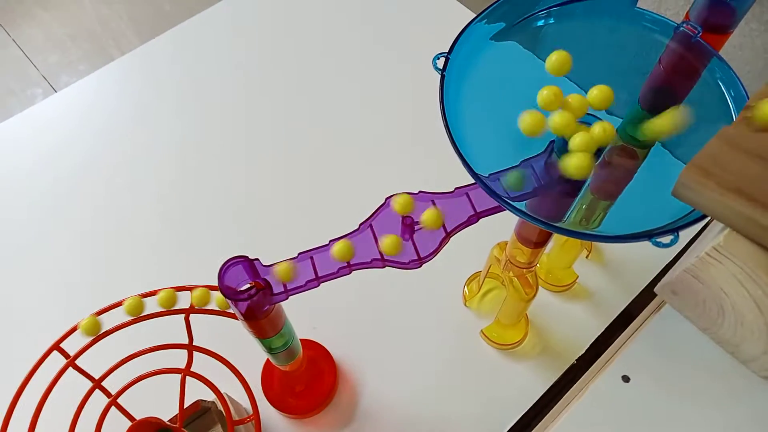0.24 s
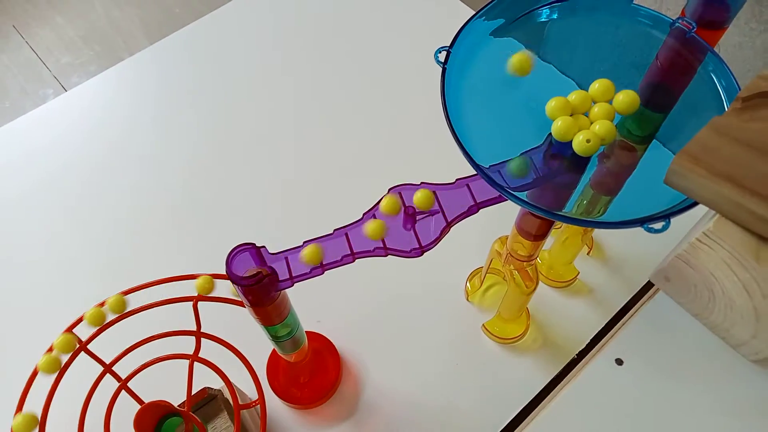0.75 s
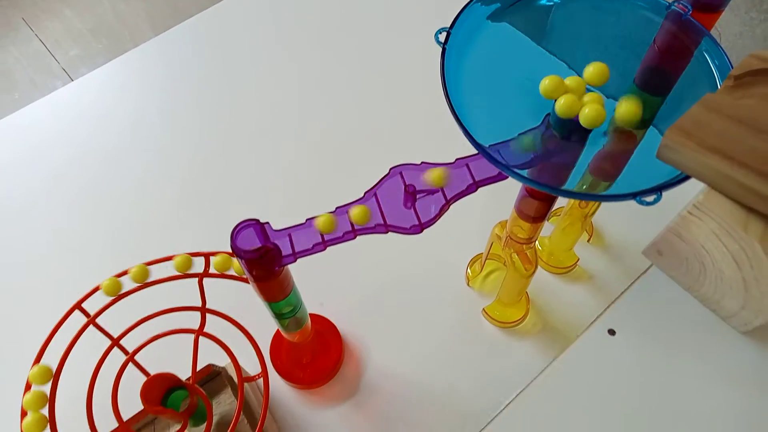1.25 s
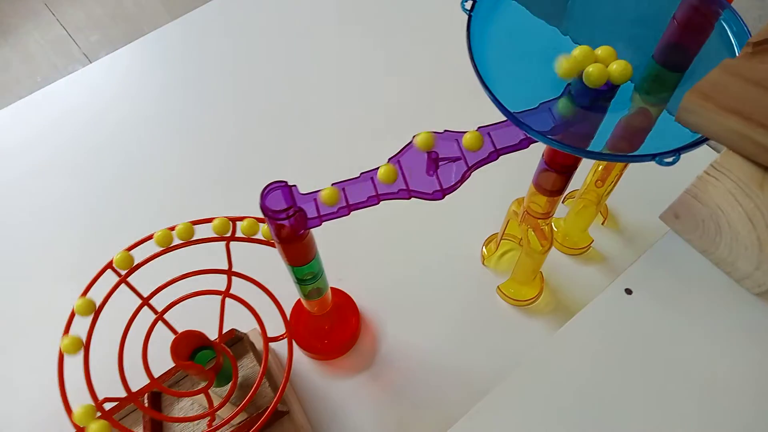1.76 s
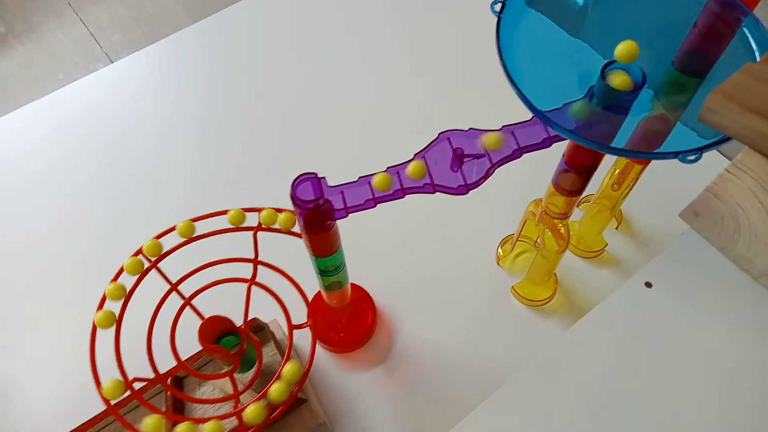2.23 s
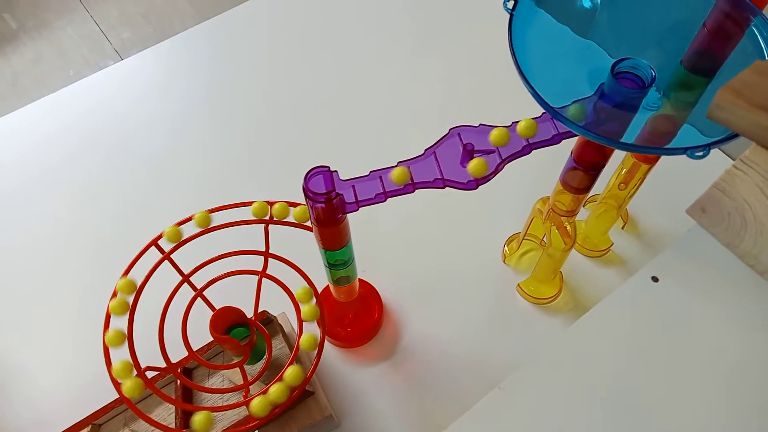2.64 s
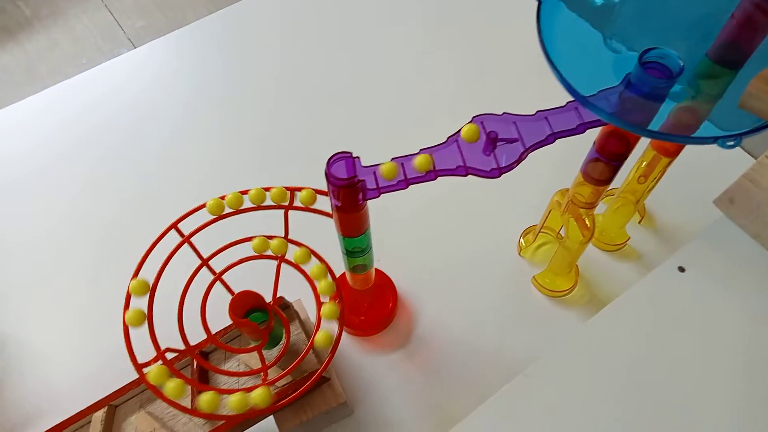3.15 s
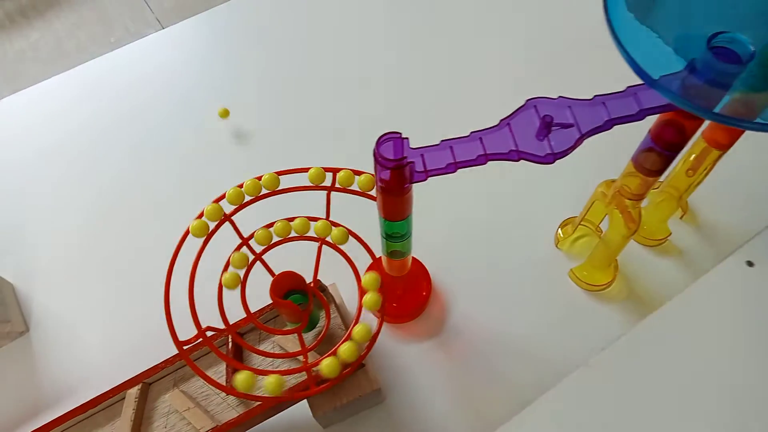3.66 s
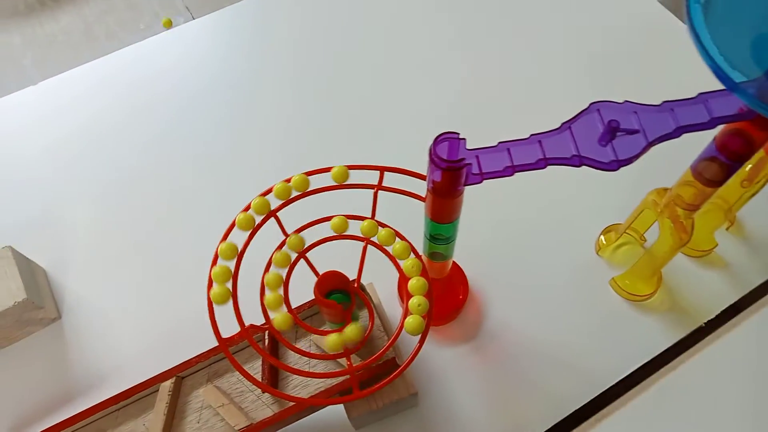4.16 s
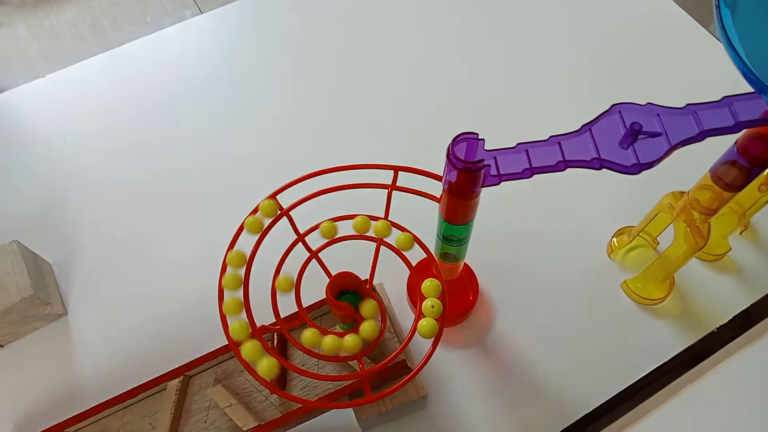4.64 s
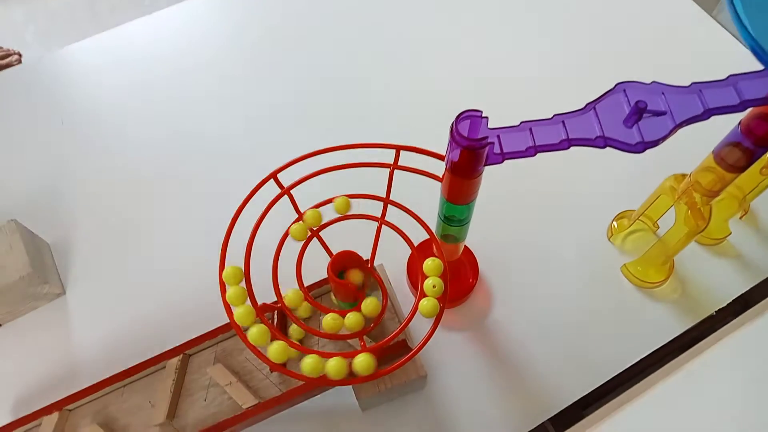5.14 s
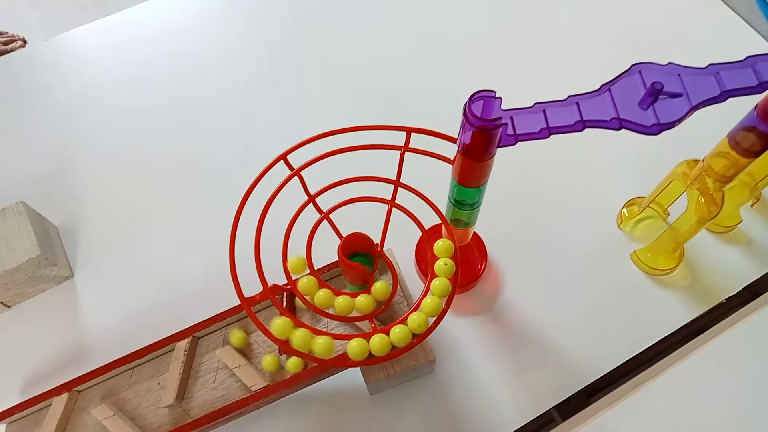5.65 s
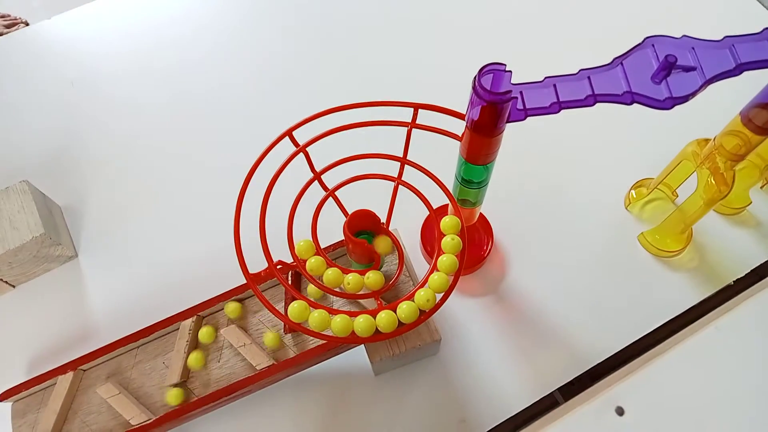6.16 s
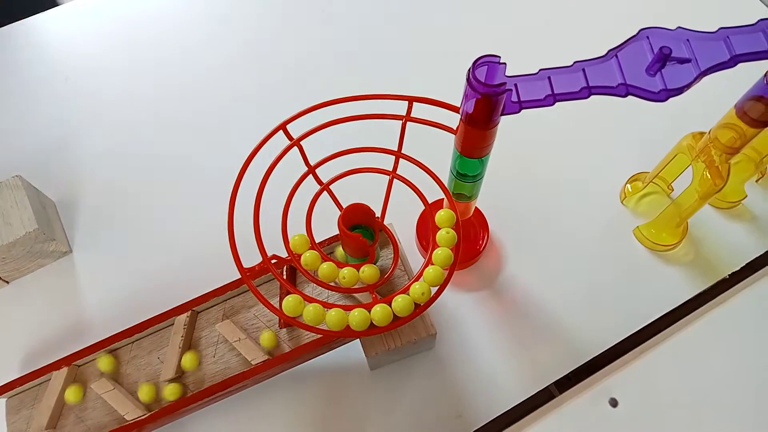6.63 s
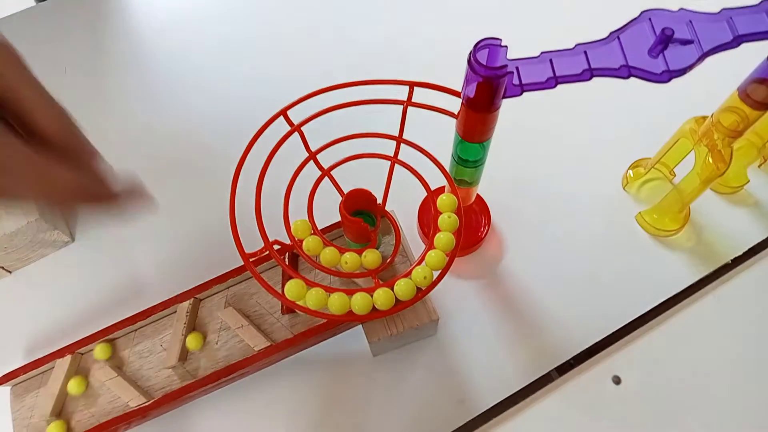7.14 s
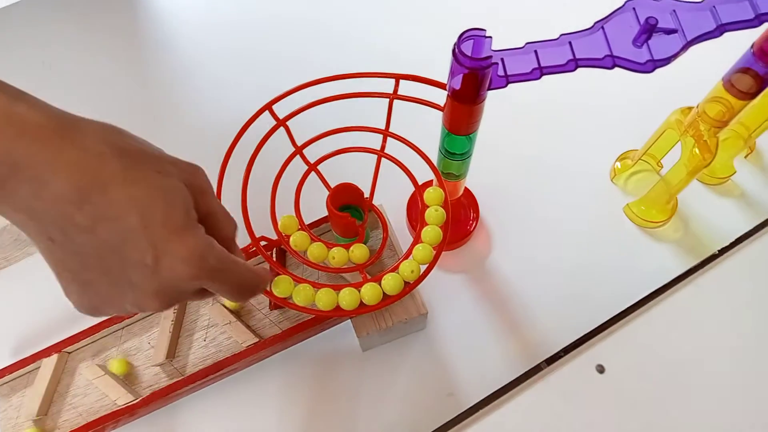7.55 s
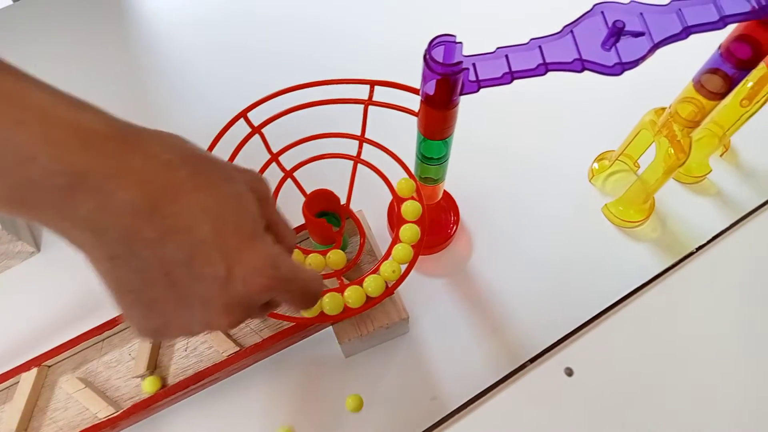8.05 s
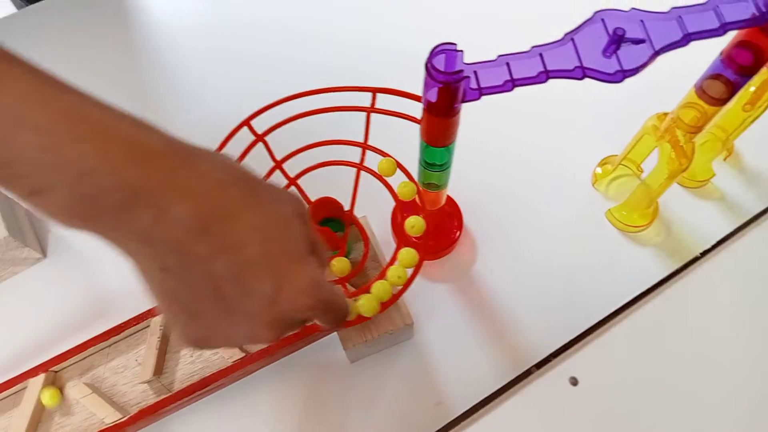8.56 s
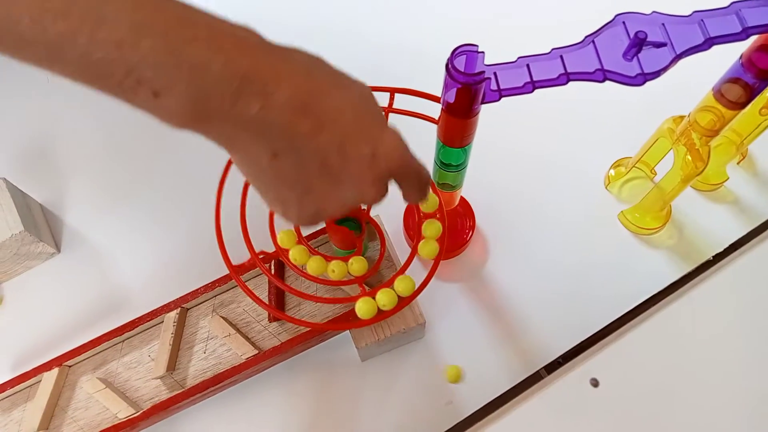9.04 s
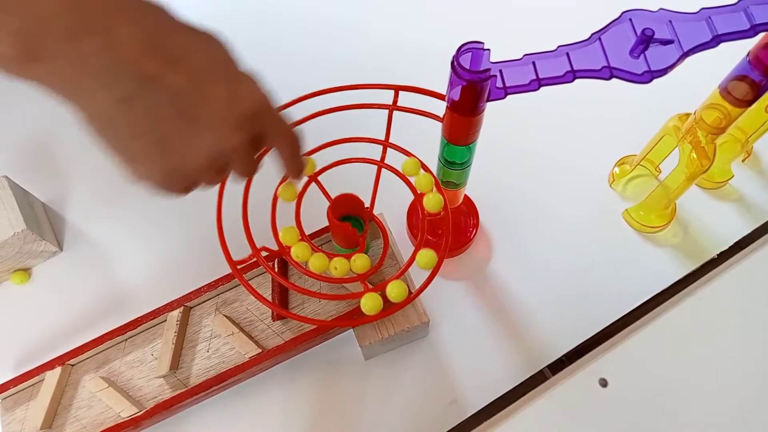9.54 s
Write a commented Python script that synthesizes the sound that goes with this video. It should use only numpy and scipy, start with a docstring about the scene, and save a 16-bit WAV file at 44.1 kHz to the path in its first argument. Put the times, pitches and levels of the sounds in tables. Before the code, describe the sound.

Close up in a bare, lively room, a crowd of light plastic balls clatters through toy tracks. Hollow tube drops and dense chatter come first, easing into sparser clicks. A stray ball skips away with accelerating, fading ticks; distant floor bounces and faint metallic pings follow. Woody knocks patter down a ramp, with soft table bumps, before stirred marbles clack loudly and irregularly, much stronger than before, and tail off.

```python
"""Marbles in a toy track

Plastic marbles run through funnel, chute, spiral rails and wooden ramp on a table in a bare room; a hand stirs the jam.
Clacks and rattle are impulses filtered by contact spectra; tube, track, ramp, table and metal ring as damped modes.
Floor bounces are bare clicks; rolling, funnel hum and a low rumble are filtered noise.
Dense decaying echoes, led by one wall, form the room."""
import sys
import numpy as np
from scipy import signal
from scipy.fft import rfft, irfft
from scipy.io import wavfile

SR = 44100
rng = np.random.default_rng(int(sys.argv[2]) if len(sys.argv) > 2 else 0)


def dump_mix(stems):
    """Bounce the given channels to the path in sys.argv[1] as a 16-bit WAV at rate SR."""
    frames = np.atleast_2d(stems).T  # one column per channel
    limited = np.clip(frames, -1, 1)  # hard clip at full scale
    pcm = np.round(limited * 32767).astype(np.int16)
    wavfile.write(sys.argv[1], SR, pcm)


N = 432180
LEAD = SR // 2   # samples: the marbles are already running when the sound begins

# All levels in the tables are relative: some sources are scaled again in the mix.
# single clacks: start_s, body_level_db, tick_level_db
CLACK_EVENTS = [(1.002, -11, -14.5), (1.2694, -14.5, -22), (1.284, -15.5, -8.5), (1.5283, -12.5, -14),
                (2.2617, -35, -11.5), (2.3761, -18, -10.5), (2.5508, -21, -9.5), (3.2436, -31.5, -25.5),
                (3.4304, -12, -16), (3.541, -22, -14.5), (3.6868, -15, -23), (3.7458, -31, -40),
                (5.2859, -16, -29), (5.8579, -10.5, -22), (7.1397, 0, -11.5), (7.2427, -2, -17),
                (7.328, -3, -23), (7.3709, -1, -39), (7.399, -7, -15.5), (7.462, -7, -14),
                (7.4792, 1.5, -15), (7.5009, -5, -9.5), (7.525, -4, -20), (7.5742, -1, -13),
                (7.591, -8, -11), (7.6056, -3, -30), (7.657, -4, -24), (7.674, -3, -11),
                (7.6939, -1.5, -24), (7.768, -1.5, -18), (7.7781, -3, -14.5), (7.8345, 1, -9),
                (7.864, -2.5, -13), (7.898, -7.5, -22), (7.9387, -0.5, -29), (8.0058, 0, -4.5),
                (8.1203, -3, -1.5), (8.2719, -2.5, -6.5), (8.3477, -7, -18), (8.4092, -1.5, -6),
                (8.4764, -3.5, -13.5), (8.5418, -9, -26), (8.617, -12, -27), (8.6276, -5, -19),
                (8.68, -16.5, -29), (8.7348, -8.5, -32), (8.8276, -11, -34), (9.0517, 0.5, -4),
                (9.1799, -10.5, -21), (9.2673, -11.5, -33), (9.324, 2, -4.5)]
# hollow of the plastic under a clack: pitch_hz, level_db, t60_s
HOLLOW_MODES = [(556, 1, 0.019), (873, 0.5, 0.026)]
# one marble jumps the track and hops across the table: start_s of each touch
HOP_TIMES = [3.329, 3.6006, 3.782, 3.9049, 4.0003, 4.0755, 4.135]
HOP_DB, HOP_LOSS_DB = 2, 3   # body of the first touch, and loss with every hop
HOP_TICK_DB, HOP_TICK_LOSS_DB = -6.5, 6.5
HOP_THUD_DB = -32.5   # answer of the table top to the first hop
# spectrum of a sharp contact as the microphone colours it: pitch_hz, level_db
CONTACT_SPECTRUM = [(350, -18.5), (570, -15), (720, -6), (880, -8), (1230, -9.5), (2130, -1.5),
                    (3440, -0.5), (5190, -14), (7010, 0.5), (8600, -15), (12600, -28.5), (15300, -9.5)]

# loose rattle of many marbles: start_s, level_db
RATTLE_LEVEL = [(0, -29), (1.1, -35.5), (1.4, -30), (1.95, -36), (2.3, -28.5), (3.2, -33.5), (4.2, -31.5),
                (4.35, -42), (5.7, -35.5), (6.0, -30), (6.9, -28), (7.3, -24), (7.9, -25), (8.9, -28),
                (9.449, -26.5), (9.8, -47)]
RATTLE_SPREAD_DB, RATTLE_ROOM_DB = 3.5, -6
# where the crowd is: funnel, chute, spiral rails, wooden ramp, stirred by hand:
# start_s, contacts_per_s, tick_db, hollow_db, track_ring_db (these three above the body),
# sparkle_db (above the tick), knock_db (hollow knock above the body of a single clack)
CROWD_STAGES = [(0, 450.1, -3, -5, 0.5, -4, -18), (2.6, 198.8, 1.5, -4, 0, -9.5, -15),
                (3.799, 303.3, -10, -12, -8, -7, -11), (5.9, 168, -18.5, -14.5, -10.5, -16.5, -14),
                (7.0, 168.7, -4, -2, -32, -20, -9)]
STAGE_FADE_S = 0.24
# short rings of the plastic track pieces: pitch_hz, level_db, t60_s
TRACK_MODES = [(943, -12.5, 0.097), (1590, 1.5, 0.023), (2504, -2, 0.094), (3572, 9.5, 0.011)]

# drops into the tube under the funnel: start_s, level_db
DROP_EVENTS = [(0.0169, -4.5), (0.076, -6.5), (0.162, -5.5), (0.3594, -5), (0.495, -6)]
# modes of the tube: pitch_hz, level_db, t60_s
TUBE_MODES = [(1484, -1, 0.018), (1554, 3, 0.023)]
TUBE_CLACK_DB, TUBE_TICK_DB = -6, -3   # each drop also clacks; relative to the drop's level

# landings on the ramp: start_s, ring_level_db, clack_level_db
LANDING_EVENTS = [(4.666, -25.5, -8.5), (4.708, -20.5, -39), (4.851, -36, -17), (4.995, -25, -11),
                  (5.106, -29, -14.5), (5.157, -31.5, -15.5), (5.355, -22.5, -11), (5.466, -28.5, -18.5),
                  (5.777, -23.5, -10.5), (6.429, -21, -6.5), (6.499, -28, -27)]
# modes of the wooden ramp: pitch_hz, level_db, t60_s
RAMP_MODES = [(226, -2, 0.021), (890, 0, 0.045), (1705, 1, 0.035), (2090, 0, 0.06), (2490, 0, 0.04),
              (2692, 2, 0.06), (2902, 3, 0.085)]
LANDING_TICK_DB = -20   # relative to the clack
REBOUND_S, REBOUND_DB = 0.013, -2   # a landing marble touches again at once
SKITTER_S = 0.037   # decay time constant of the flurry as a marble skitters on
# marbles knock the slats on their way down the ramp: start_s, level_db
SLAT_EVENTS = [(5.884, -11), (5.901, -18), (5.942, -18), (5.9876, -17), (6.088, -13.5), (6.1075, -23),
               (6.123, -17), (6.2149, -14.5), (6.363, -20), (6.4052, -12.5), (6.5457, -20), (6.572, -9),
               (6.6874, -18), (6.7098, -19), (6.765, -15), (6.881, -15), (6.963, -13), (7.016, -11.5),
               (7.0528, -17.5), (7.087, -19), (7.195, -10.5)]
# modes of a slat: pitch_hz, level_db, t60_s
SLAT_MODES = [(2675, 3, 0.013), (3330, 4.5, 0.013)]
SLAT_CLACK_DB, SLAT_TICK_DB = 0, -12.5   # relative to the knock

# bounces on the hard floor, further off: start_s, level_db
BOUNCE_EVENTS = [(4.041, -13.5), (4.514, -7.5), (4.5282, -5), (4.6304, -10.5), (4.876, -13),
                 (5.1072, -12.5), (5.3133, -20), (5.409, -28), (5.739, -16), (6.44, -13.5), (8.8418, -8.5),
                 (9.4865, -9), (9.739, -11.5)]
# spectrum of one floor bounce: pitch_hz, level_db
BOUNCE_SPECTRUM = [(2350, -19.5), (4000, -0.5), (5230, -19.5), (7530, 3), (8730, -4.5), (15600, -12.5)]
# marbles touching something metal by the floor: start_s, level_db
PING_EVENTS = [(4.7064, -25), (5.0554, -25.5), (5.1064, -27.5), (5.3168, -35), (5.412, -36.5), (5.739, -26)]
# modes of the metal: pitch_hz, level_db, t60_s
METAL_MODES = [(7710, 4, 0.35), (9600, -0.5, 0.053), (14100, -25, 0.13)]

# bumps against the table: start_s, level_db
BUMP_EVENTS = [(6.838, -18.5), (6.857, -19.5), (7.061, -13.5)]
# modes of the table top: pitch_hz, level_db, t60_s
TABLE_MODES = [(97, -12.5, 0.85), (170, 1, 0.07), (275, 5, 0.055), (350, 3, 0.035), (500, -2, 0.03)]
TABLE_ROOM_DB = -16
# a dull low handling thud: start_s, level_db
THUD_EVENTS = [(4.775, -37)]
# mode of the handling thud: pitch_hz, level_db, t60_s
THUD_MODES = [(64, 0, .4)]

# marbles rolling down the wood: start_s, length_s, level_db
ROLLING_RUNS = [(5.847, 0.17, -25), (6.606, 0.18, -31.5), (6.871, 0.23, -26.5)]
ROLL_EDGE_S, ROLL_SAG_DB_PER_S = 0.017, 18
# hum of the funnel under circling marbles
FUNNEL_HZ, FUNNEL_WIDTH_HZ, FUNNEL_DB, FUNNEL_EMPTIES_DB_PER_S = 136.2, 2.5, -37, 14

# spectrum of the low rumble: pitch_hz, level_db
RUMBLE_SPECTRUM = [(25, -29), (49, -9), (123, 7), (413, -5), (600, -19), (1320, -120)]
# the low rumble comes and goes: start_s, level_db
RUMBLE_LEVEL = [(0, -41.5), (1.5, -44.5), (4, -51), (5.5, -41.5), (8.5, -50)]
# reverberation time of the room: pitch_hz, t60_s
ROOM_DECAY = [(200, 1), (700, 0.8), (3000, 0.92), (9000, 0.35), (15000, 0.42)]
ROOM_GAP_S = 0.010   # the echoes rise from silence over this time
SLAP_S, SLAP_DB = 0.021, 7   # the nearest wall answers in one lump
SEND_CUT_HZ = 8400   # the treble of near marbles hardly fills the room
CUTOFF_HZ = 16200


def clacks(parts):
    """Impact of hard plastic: a contact spectrum over a damped hollow; returns direct sound and room send."""
    near, far = np.zeros(N + 1100), np.zeros(N + 1100)
    hollow_blows = []
    for s, body_db, tick_db in blows():
        *_, sparkle_db, knock_db = crowd(s)
        click = from_db([body_db, tick_db, tick_db + sparkle_db]) @ parts[[0, 1, 3]]
        at = round(s * SR)
        near[at:at + 1099] += from_db(-5.0) * np.convolve(click, contact(length_s=0.0032))
        far[at:at + 700] += from_db(5.5) * click
        hollow_blows.append((s, body_db + knock_db))
    knock = ring(hollow_blows, HOLLOW_MODES, spread_db=0.5, touch_s=0.0023, detune=0.052)
    knock = band(knock, 244, 2440)
    return near[:N] + knock, far[:N] + from_db(-8.0) * knock


def blows():
    """Collisions as point events (start_s, body_db, tick_db): clacks, hops, drops, slat knocks and landings."""
    hops = [(s, HOP_DB - HOP_LOSS_DB * k, HOP_TICK_DB - HOP_TICK_LOSS_DB * k)
            for k, s in enumerate(HOP_TIMES)]
    drops = [(s, db + TUBE_CLACK_DB, db + TUBE_TICK_DB) for s, db in DROP_EVENTS]
    knocks = [(s, db + SLAT_CLACK_DB, db + SLAT_TICK_DB) for s, db in SLAT_EVENTS]
    landings = [(s, db, db + LANDING_TICK_DB) for s, _, db in LANDING_EVENTS]
    rebounds = [(s + REBOUND_S, db + REBOUND_DB, tick_db) for s, db, tick_db in landings]
    return CLACK_EVENTS + hops + drops + knocks + landings + rebounds


def voices():
    """Spectral decomposition of a sharp contact into body, tick, hollow and sparkle, each of peak 1."""
    click = impulse(CONTACT_SPECTRUM)[:700]
    ranges_hz = [(1066, 4000), (3850, 9200), (305, 2120), (9230, 14340)]
    parts = np.array([band(band(click, low, high), low / 2, high) for low, high in ranges_hz])
    return parts / np.abs(parts).max(axis=1, keepdims=True)


def contact(length_s):
    """Chatter of a contact: one sharp touch, then a random flurry decaying exponentially."""
    touches = 0.5 * rng.standard_normal(400) * np.exp(-np.arange(400) / (length_s * SR))
    touches[0] = 1
    return touches


def rattle(parts):
    """Random point process: short contacts of uneven size, each with its own spectral balance and track ring."""
    count = N + LEAD
    t = (np.arange(count) - LEAD) / SR
    body_db, per_s, tick_db, hollow_db, ring_db, sparkle_db, _ = crowd(t)
    at = np.flatnonzero(rng.random(count) < per_s / SR)
    size_db = RATTLE_SPREAD_DB * np.minimum(rng.exponential(1, len(at)), 3.0)
    decay = np.exp(-1 / (0.0029 * SR))
    out = 0
    for db, part in zip([0, tick_db, hollow_db, tick_db + sparkle_db], parts):
        struck = np.full(count, 1e-18)
        struck[at] = from_db(size_db + 5 * rng.standard_normal(len(at)))
        flurry = signal.lfilter([1], [1, -decay], struck) * rng.standard_normal(count)
        bursts = flurry + 2.9 * struck
        out = out + from_db(db) * rms_one(coloured(bursts, part))
    rings = band(track_rings(at, size_db, count), 380, 4700)
    return from_db(body_db) * (out + from_db(ring_db) * rms_one(rings))


def track_rings(at, size_db, count):
    """Two-pole resonance: each contact excites one mode, drawn from three differently tuned sets."""
    piece = rng.integers(0, 3 * len(TRACK_MODES), len(at))
    rings = 0
    for k, (hz, level_db, t60) in enumerate(TRACK_MODES * 3):
        struck = np.full(count, 1e-18)
        struck[at[piece == k]] = from_db(size_db[piece == k] + level_db)
        radius = from_db(-60 / (t60 * SR))
        detune = 1 + 0.043 * (k // len(TRACK_MODES) - 1)
        w = 2 * np.pi * hz * detune / SR
        rings = rings + signal.lfilter([1, 0, -1], [1, -2 * radius * np.cos(w), radius ** 2], struck)
    return rings


def crowd(t):
    """Linear interpolation of the rattle level and the stage columns, one stage fading into the next."""
    rows = np.array(CROWD_STAGES)
    ends = np.append(rows[1:, 0], N / SR) - 1e-3
    # each stage holds from the end of its fade-in until the next stage begins
    knots = np.ravel([rows[:, 0] + STAGE_FADE_S, ends], "F")
    columns = [np.interp(t, knots, np.repeat(c, 2)) for c in rows.T[1:]]
    return np.interp(t, *np.transpose(RATTLE_LEVEL)), *columns


def tube():
    """Modal resonance: each drop excites the damped modes of the tube."""
    return from_db(5.0) * ring(DROP_EVENTS, TUBE_MODES, spread_db=-3.0, touch_s=0.0024)


def ramp():
    """Modal resonance: landings, each with a skitter, ring the ramp, and knocks ring its slats."""
    landings = ring(LANDING_EVENTS, RAMP_MODES, spread_db=3.0, touch_s=0.0012, skitter=0.01, detune=0.0047)
    slats = ring(SLAT_EVENTS, SLAT_MODES, spread_db=3.5, touch_s=0.0017, detune=0.02)
    return from_db(7.0) * band(landings, 95, 6600) + slats


def bounces():
    """Non-resonant impact: a small hard ball on a hard floor gives bare clicks, with nothing to ring."""
    clicks = np.zeros(N)
    clicks[[round(s * SR) for s, _ in BOUNCE_EVENTS]] = from_db(np.array(BOUNCE_EVENTS)[:, 1])
    click = impulse(BOUNCE_SPECTRUM)
    return coloured(clicks, click / np.abs(click).max())


def chatter(clicks):
    """Chatter: each floor bounce is a sharp touch and a few ms of random flurry."""
    return coloured(clicks, contact(length_s=0.0065))


def metal():
    """Modal resonance: a short touch and a faint skitter excite high, detuned metal modes."""
    pings = ring(PING_EVENTS, METAL_MODES, spread_db=5.5, touch_s=0.00079, skitter=0.0045, detune=0.00325)
    return from_db(-8.5) * pings


def table():
    """Modal resonance: bumps and hops excite the table top; a dull low handling thud has one mode."""
    hops = [(s, HOP_THUD_DB - HOP_LOSS_DB * k) for k, s in enumerate(HOP_TIMES)]
    out = ring(BUMP_EVENTS, TABLE_MODES, spread_db=0, touch_s=0.004, skitter=0.05)
    out += ring(hops, TABLE_MODES, spread_db=4, touch_s=0.0012)
    return out + ring(THUD_EVENTS, THUD_MODES, spread_db=0, touch_s=0.01)


def ring(events, modes, spread_db, touch_s, skitter=0, detune=0):
    """Modal synthesis: each blow, spread over the touch time, strikes every mode unevenly and a little off pitch.
    A flurry may follow, felt most by the high modes (skitter per kHz)."""
    out = np.zeros(N + 2 * SR)
    for s, db, *_ in events:
        for hz, level_db, t60 in modes:
            n = np.arange(int((t60 + 8 * SKITTER_S * (skitter > 0)) * SR))
            strength, off = rng.standard_normal(2)
            clicks = skitter * hz / 1000 * rng.standard_normal(len(n)) * np.exp(-n / (SKITTER_S * SR))
            clicks[0] = 1
            turn = np.exp(2j * np.pi * hz * (1 + detune * off) / SR)
            swell = np.exp(-1 / (touch_s * SR))   # a second pole on the same pitch lets the mode build up
            tone = signal.lfilter([1], [1, -from_db(-60 / (t60 * SR)) * turn], clicks)
            tone = signal.lfilter([1 - swell], [1, -swell * turn], tone).imag
            out[round(s * SR) + n] += from_db(db + level_db + spread_db * strength) * tone
    return out[:N]


def rolling():
    """Surface roughness: grainy noise of the wood through the hollow of the ramp; each run fades as it leaves."""
    t = np.arange(N) / SR
    runs = 0
    for s, length, db in ROLLING_RUNS:
        sag_db = ROLL_SAG_DB_PER_S * np.clip(t - s, 0, length)
        edges = np.clip(np.minimum(t - s, s + length - t) / ROLL_EDGE_S, 0, 1)
        runs = runs + from_db(db - sag_db) * edges
    grain = rng.standard_normal(N) ** 3   # cubing makes the noise spiky
    return runs * rms_one(band(grain, 780, 1500))


def funnel():
    """Resonance driven by noise: one narrow low band, fading as the funnel empties."""
    noise = rng.standard_normal(N + LEAD)
    hum = band(noise, FUNNEL_HZ - FUNNEL_WIDTH_HZ, FUNNEL_HZ + FUNNEL_WIDTH_HZ)[LEAD:]
    return from_db(FUNNEL_DB - FUNNEL_EMPTIES_DB_PER_S * np.arange(N) / SR) * rms_one(hum)


def rumble():
    """Spectral shaping: white noise is filtered to the low rumble, whose level comes and goes."""
    level_db = np.interp(np.arange(N) / SR, *np.transpose(RUMBLE_LEVEL))
    return from_db(level_db) * rms_one(coloured(rng.standard_normal(N), impulse(RUMBLE_SPECTRUM)))


def room(x):
    """Reverberation: dense echoes rise, swell with the first wall and die band by band; energy 1."""
    t = np.arange(SR) / SR
    edges = 60 * 2 ** np.arange(0, 8.6, 0.5)   # half-octave bands, Hz
    slap = from_db(SLAP_DB * np.exp(-((t - SLAP_S) / 0.005) ** 2))
    white = slap * rng.standard_normal((2, SR))   # neighbouring bands take different noise
    echoes = 0
    for k, (low, high) in enumerate(zip(edges, edges[1:])):
        t60 = at_hz(ROOM_DECAY, np.sqrt(low * high))
        echoes = echoes + band(white[k % 2], low, high) * from_db(-60 * t / t60)
    echoes *= np.clip(t / ROOM_GAP_S, 0, 1) ** 2
    return signal.fftconvolve(x, echoes / np.sqrt(np.sum(echoes ** 2)))[:len(x)]


def impulse(spectrum):
    """Minimum phase: folding the cepstrum gives a causal response with the given spectrum."""
    cepstrum = irfft(np.log(from_db(at_hz(spectrum, np.fft.rfftfreq(8192, 1 / SR)))))
    cepstrum[1:4096] *= 2
    cepstrum[4097:] = 0
    return irfft(np.exp(rfft(cepstrum)))[:4096]


def from_db(db):
    """Logarithmic level: decibels to amplitude gain."""
    return 10 ** (np.asarray(db) / 20)


def rms_one(x):
    """Normalisation: scale to rms 1."""
    return x / np.sqrt(np.mean(x ** 2) + 1e-20)


def at_hz(points, hz):
    """Interpolation of a table on a log-frequency axis."""
    table_hz, values = np.array(points)[:, :2].T
    return np.interp(np.log(hz + 1), np.log(table_hz), values)


def coloured(x, response):
    """Convolution of a signal with an impulse response."""
    return signal.oaconvolve(x, response)[:len(x)]


def band(x, low_hz, high_hz):
    """Band limitation by a Butterworth band-pass."""
    return signal.sosfilt(signal.butter(3, [low_hz, high_hz], "band", fs=SR, output="sos"), x)


def scene():
    """Superposition: all sources add, direct and through the room."""
    parts = voices()
    near, far = clacks(parts)
    loose = rattle(parts)
    in_tube, on_ramp, on_metal, on_table = tube(), ramp(), metal(), table()
    floor, wood = bounces(), rolling()

    sent = from_db(RATTLE_ROOM_DB) * loose
    sent[LEAD:] += far
    sent = signal.sosfilt(signal.butter(2, SEND_CUT_HZ, fs=SR, output="sos"), sent)
    sent[LEAD:] += from_db(9.5) * floor + from_db(-8.5) * in_tube + from_db(-8.0) * on_ramp
    sent[LEAD:] += from_db(-8.0) * on_metal + from_db(TABLE_ROOM_DB) * on_table + from_db(-7.0) * wood

    direct = near + loose[LEAD:] + in_tube + on_ramp + from_db(-6.5) * chatter(floor)
    direct = direct + on_metal + on_table + wood + funnel() + rumble()
    return (direct + room(sent)[LEAD:])[None]


def record(dry):
    """Saturation and band limitation: peaks are rounded, the lowest bass and the top are cut."""
    rounded = 0.92 * np.tanh(dry / 1.35)
    thinned = signal.sosfilt(signal.butter(2, 45, "high", fs=SR, output="sos"), rounded)
    return signal.sosfilt(signal.cheby2(14, 40, CUTOFF_HZ, fs=SR, output="sos"), thinned)


dry = scene()
out = record(dry)
dump_mix(out)
```